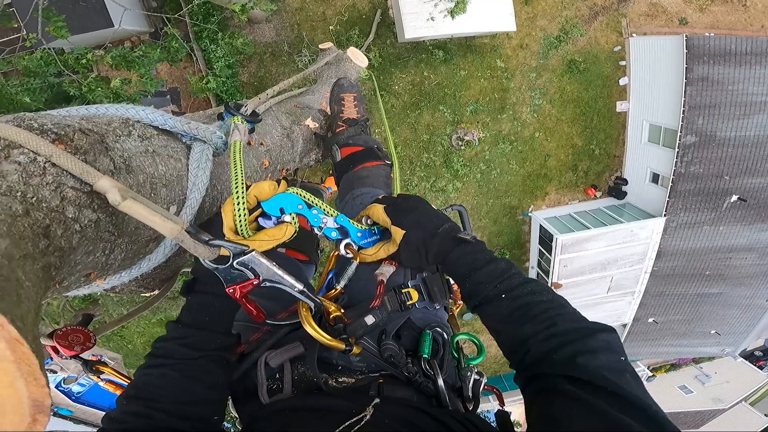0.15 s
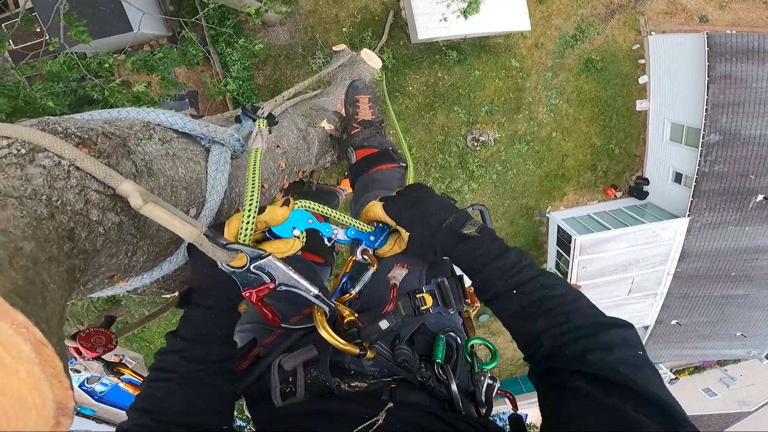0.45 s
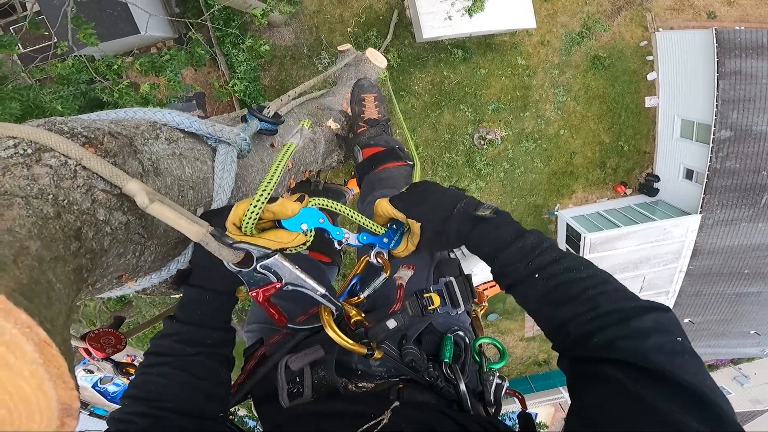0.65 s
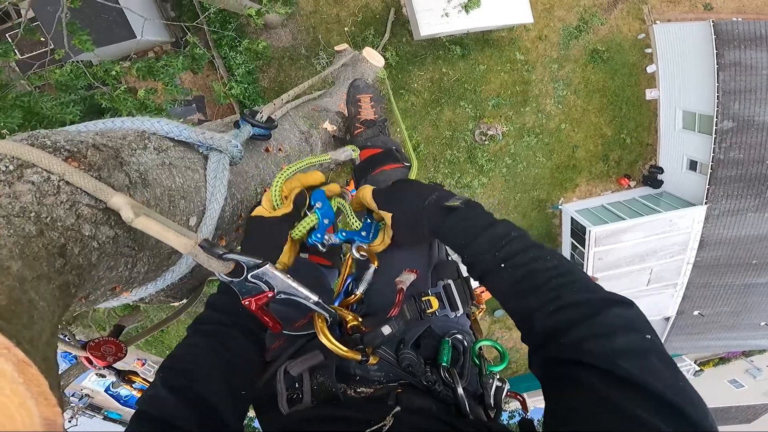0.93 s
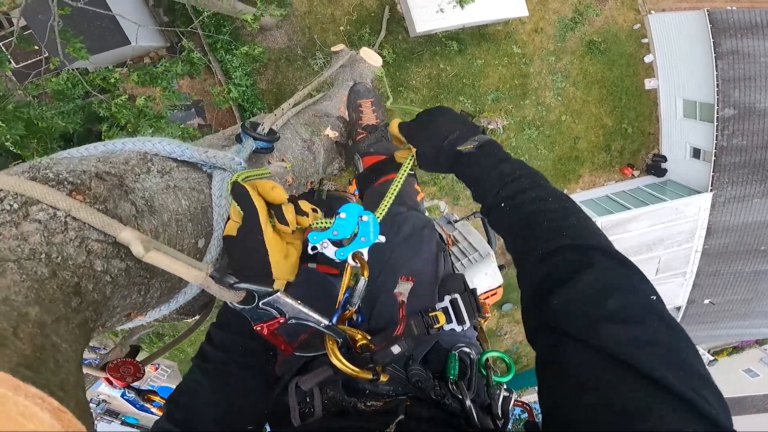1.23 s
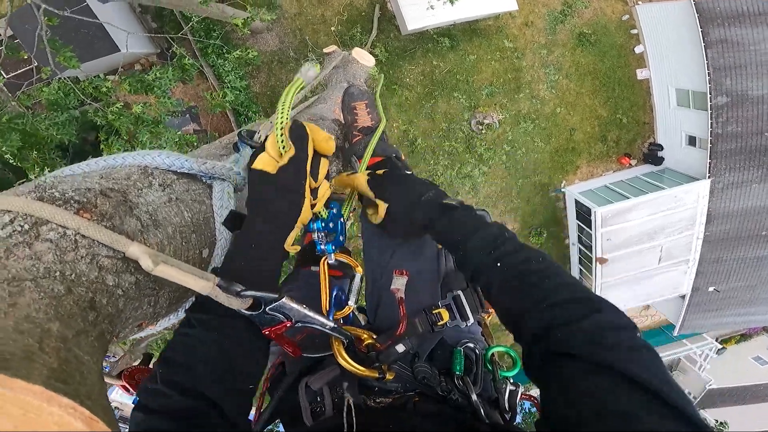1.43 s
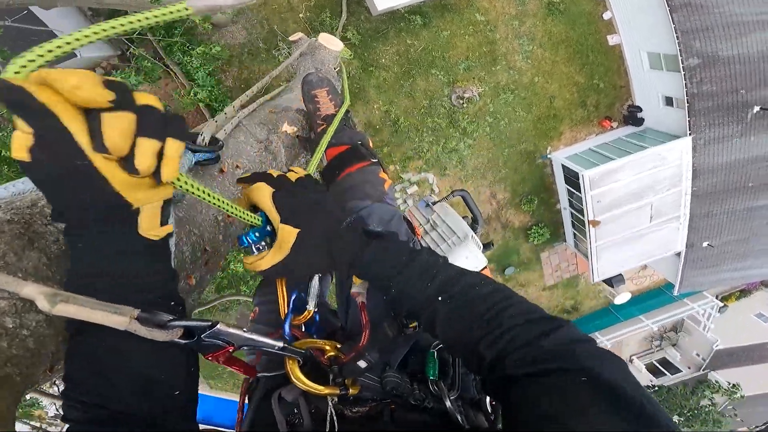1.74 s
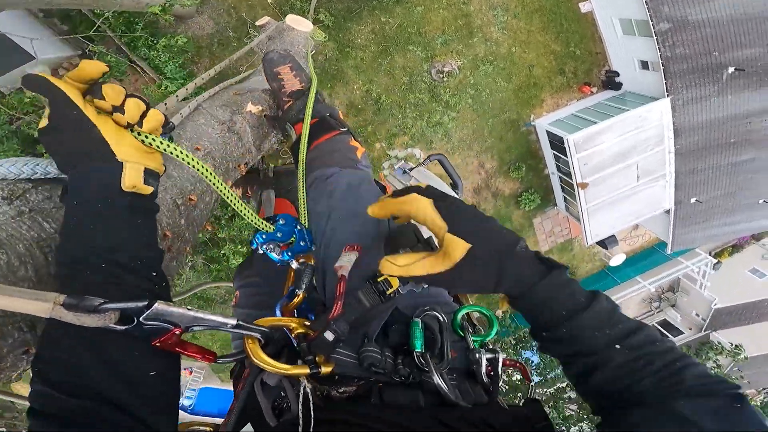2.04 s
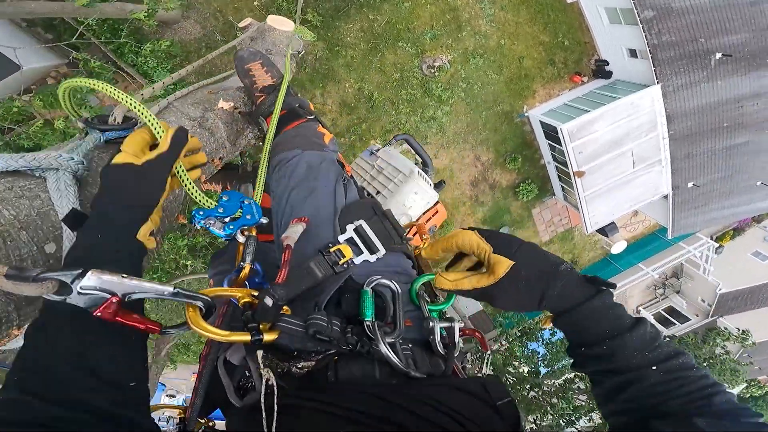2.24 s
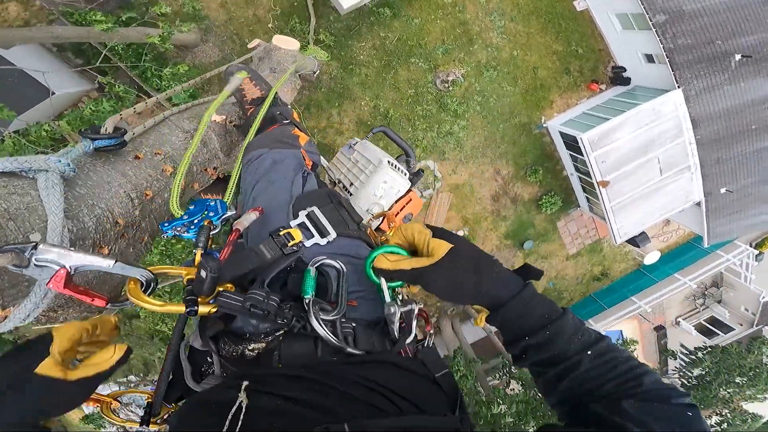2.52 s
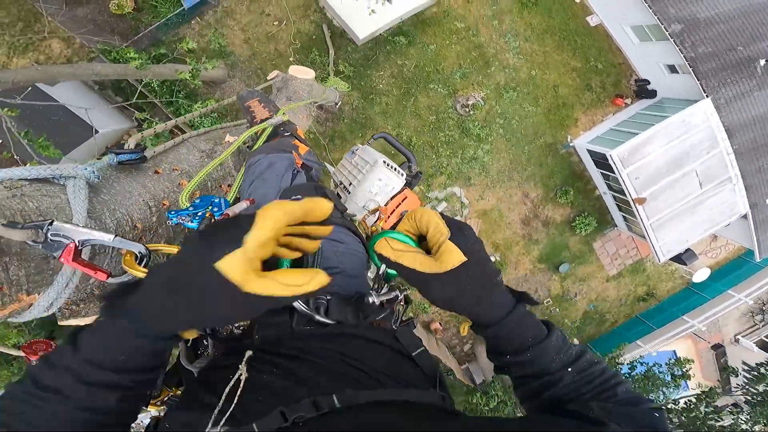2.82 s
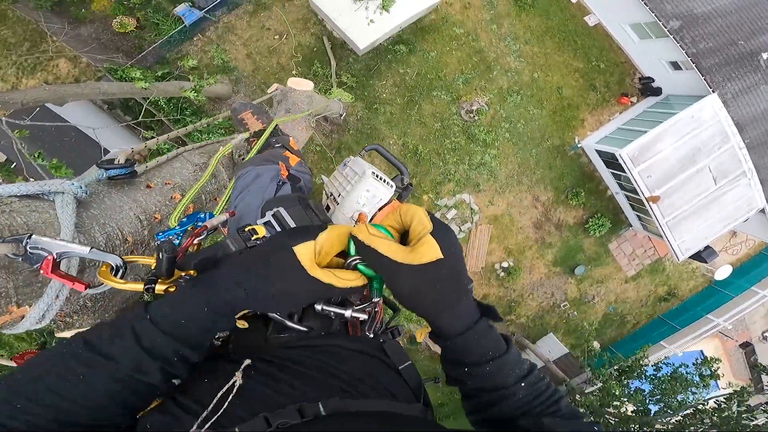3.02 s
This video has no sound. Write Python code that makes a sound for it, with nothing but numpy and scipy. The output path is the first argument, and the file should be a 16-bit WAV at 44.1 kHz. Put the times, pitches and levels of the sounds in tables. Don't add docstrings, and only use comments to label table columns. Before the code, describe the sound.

A metal rope device handled close by: light ringing cam ticks from 0.9 s, a loud rapid latch snap at 1.3, a double plate knock at 1.7. A rope pull scrapes from 1.8 to about 2.3 with dull cam chatter and glove rustle. Soft gear taps from 2.5, bright carabiner clinks near 3.0. A machine drones steadily, duller after 1.8; low wind buffets the near-mono microphone, strongest around 2.6.

```python
import sys
import numpy as np
from scipy import signal
from scipy.fft import rfft, irfft
from scipy.io import wavfile
from scipy.ndimage import uniform_filter1d

SR = 44100
rng = np.random.default_rng(int(sys.argv[2]) if len(sys.argv) > 2 else 0)


def level_to_linear(level):
    exponent = np.asarray(level, float) / 20
    return 10 ** exponent


def wav_out(sig):
    wavfile.write(sys.argv[1], SR, np.round(np.clip(np.atleast_2d(sig).T, -1, 1) * 32767).astype(np.int16))


N = 139797


def read(points, hz):
    f, value = np.transpose(points)
    return np.interp(np.log(hz + 1), np.log(f + 1), value)


def curve(rows, column=1):
    return np.interp(np.arange(N) / SR, np.array(rows)[:, 0], np.array(rows)[:, column])


def evened(x):
    return x / np.sqrt(np.mean(x ** 2) + 1e-20)


def band_rms(x, lo_hz, hi_hz):
    z, hz = rfft(x), np.fft.rfftfreq(len(x), 1 / SR)
    in_band = (hz > lo_hz) & (hz < hi_hz)
    return np.sqrt(2 * np.sum(abs(z[in_band]) ** 2)) / len(x)


def highpass(x, order, cutoff_hz):
    return signal.sosfilt(signal.butter(order, cutoff_hz, "high", fs=SR, output="sos"), x)


def resonate(x, hz, width_hz):
    turn = np.exp(2j * np.pi * hz * np.arange(len(x)) / SR)
    r = np.exp(-np.pi * width_hz / SR)
    return 2 * (turn * signal.lfilter([1 - r], [1, -r], x / turn)).real


def noise(points, size, patchy_db, flicker_db, tilt=None):
    hop = size // 4
    frames, hz = 4 * N // size + 5, np.fft.rfftfreq(size, 1 / SR)
    a, b, patches = rng.standard_normal((frames, len(hz), 3)).T
    patches = uniform_filter1d(uniform_filter1d(patches, size=8, axis=0), size=8, axis=1)
    flicker = uniform_filter1d(rng.standard_normal(frames), size=4)
    level_db = read(points, hz)[:, None] + patchy_db * evened(patches) + flicker_db * evened(flicker)
    if tilt is not None:
        octaves = np.log2(np.maximum(hz, 600) / 600)
        level_db = level_db + octaves[:, None] * tilt[np.minimum(np.arange(frames) * size // 4, N - 1)]
    spectra = (a + 1j * b) * level_to_linear(level_db)
    return evened(signal.istft(spectra, nperseg=size, noverlap=3 * hop)[1][:N])


def fibres(per_s, spread_db):
    size_db = spread_db * np.minimum(rng.exponential(1, N), 4)
    slips = level_to_linear(size_db) * (rng.random(N) < per_s / SR)
    power = np.convolve(slips ** 2, np.hanning(90), "same")
    return evened(np.sqrt(2 + evened(power)))


def clicks(events, modes, tick_s, width_hz, air_db=None):
    lead, length = 700, 5000
    hard_db, dull_db_per_db_khz = -16, .06
    grit_db, grit_s = -28, .005
    out = np.zeros(N + length)
    u = np.arange(length) / SR
    t = (np.arange(length) - lead) / SR
    cracks = rng.standard_normal((len(events), length))
    chance = rng.standard_normal((len(events), 2 * len(modes)))
    for (s, db, hz, ring_db, *own_air_db), crack, luck in zip(events, cracks, chance):
        decay = np.maximum(t - .001, 0) / tick_s
        onset = np.minimum(t - .001, 0) / min(tick_s, .0014)
        burst = crack * np.exp(onset - decay)
        body = burst
        for _ in range(3):
            body = resonate(body, hz, width_hz)
        air = resonate(resonate(burst, 11000, 7000), 11000, 7000)
        ring = 0
        for k, (f, mode_db, t60_s) in enumerate(modes):
            dull_db = dull_db_per_db_khz * max(hard_db - db, 0) * f / 1000
            gain = level_to_linear(mode_db - dull_db + 2.5 * luck[k] - 60 * u / t60_s)
            ring = ring + gain * np.sin(2 * np.pi * f * (1 + .004 * luck[-k - 1]) * u)
        strike = (t == 0) + level_to_linear(grit_db) * crack[::-1] * np.exp(-abs(t) / grit_s)
        ring = signal.fftconvolve(strike, ring * np.clip(u / .0008, 0, 1))[:length]
        air_gain = level_to_linear(own_air_db[0] if own_air_db else air_db)
        sound = body / abs(body).max() + air_gain * air / abs(air).max() + level_to_linear(ring_db) * ring
        out[round(s * SR) - lead:][:length] += level_to_linear(db) * sound
    return out[:N]


def wind():
    # t/s, level/dB
    gusts = [(0.12, -25.5), (0.83, -22.5), (0.85, -55), (1.02, -21), (2.2, -31.5), (2.61, -16.5),
             (3.16, -20)]
    # f/Hz, density/dB
    buffet = [(8.8, -43), (15, -5.5), (85, -0.5), (113, -6), (145, -4), (258, -28), (300, -29), (390, -57),
              (660, -120)]
    return level_to_linear(curve(gusts) - 2.0) * noise(buffet + [(600, -68)], size=2048, patchy_db=.5, flicker_db=1.5)


def machine():
    # t/s, level/dB, brightness/(dB/octave)
    drone = [(.06, -25, 0.5), (1.25, -25, 0), (1.75, -25.5, -2), (2.3, -28, -3.5), (2.6, -25.5, -2.5),
             (3.16, -26.5, -1)]
    # f/Hz, density/dB
    roar_spectrum = [(60, -5.5), (300, -7), (500, -12.5), (1000, -14.5), (2400, -24), (2750, -33),
                     (7000, -44.5), (15500, -81.5)]
    # f/Hz, width/Hz, level/dB
    housing = [(998, 42, -5), (3100, 610, -0.5)]
    # f/Hz, level/dB, swell when facing/dB
    lines = [(72.5, -30.5, -1.5), (178, -38, 0), (214.2, -31, 3), (250.2, -38, 0), (337.6, -30.5, -1),
             (675, -35.5, 4.5), (1012.6, -42, -3), (1349.5, -46, 2), (1748, -46, -0.5)]
    roar = noise(roar_spectrum, size=1024, patchy_db=.06, flicker_db=.81, tilt=curve(drone, column=2))
    roar = roar + sum(level_to_linear(db - 3.0) * resonate(roar, hz, width_hz) for hz, width_hz, db in housing)
    hiss, t = rng.standard_normal(N), np.arange(N) / SR
    facing_s, facing_span_s, line_width_hz = 1.8, .6, 9
    facing = 2 * np.exp(-((t - facing_s) / facing_span_s) ** 2) - 1
    hum = np.zeros(N)
    for hz, db, swell_db in lines:
        waver = evened(resonate(resonate(hiss, hz, line_width_hz), hz, line_width_hz))
        hum += level_to_linear(db + swell_db * facing) * evened(1.5 * np.sin(2 * np.pi * hz * t) + waver)
    return level_to_linear(curve(drone) - 1.5) * roar / band_rms(roar, lo_hz=315, hi_hz=880) + hum


def rustle():
    # t/s, level/dB
    rub = [(0.8, -51), (1.3, -46), (1.78, -39.5), (1.83, -29.5), (2.0, -26), (2.12, -33.5), (2.24, -41),
           (2.3, -48), (2.45, -43), (2.69, -42), (2.9, -41.5), (3.16, -39.5)]
    # f/Hz, density/dB
    rustle_spectrum = [(1500, -22), (3000, -6.5), (4000, -0.5), (4600, 1), (5400, -4.5), (7000, -10.5),
                       (9500, -21), (15500, -31.5)]
    grain = noise([(800, -45)] + rustle_spectrum, size=256, patchy_db=1.8, flicker_db=.5)
    grain = grain * fibres(per_s=2000, spread_db=1.8)
    fade_in = np.clip((np.arange(N) / SR - .7) / .2, 0, 1)
    return level_to_linear(curve(rub) - 3.5) * fade_in * grain / band_rms(grain, lo_hz=3450, hi_hz=7100)


def held_gear():
    # t/s, peak/dB, tick f/Hz, ring/dB, brightness/dB
    taps = [(2.508, -31.5, 4710, -20, -27), (2.6234, -25, 4800, -11, -3.5), (2.6473, -29, 4870, -36, -30),
            (2.6594, -28, 5500, -14, -8), (2.700, -37, 8000, -14, -20), (2.711, -22, 3550, -11, -16),
            (2.8134, -29, 4900, -17, -20), (3.0455, -32, 6950, -16, -12), (3.0510, -26, 4070, -24, -30)]
    # f/Hz, level/dB, t60/s
    held = [(8000, -4, .022), (10000, -9, .008), (12500, -9, .008), (15200, -10, .006)]
    return clicks(taps, held, tick_s=.0015, width_hz=3700)


def carabiners():
    # t/s, peak/dB, tick f/Hz, ring/dB
    clinks = [(2.938, -36, 3580, 3), (2.9640, -36, 4200, -14), (2.9712, -21, 3900, -14),
              (2.9770, -21, 3000, 3), (2.9840, -27, 3670, -8), (2.9930, -26, 3600, -10),
              (3.0770, -22, 3630, -18), (3.0825, -30, 4000, -4), (3.0930, -30, 4760, -8),
              (3.1014, -30, 3660, -9)]
    # f/Hz, level/dB, t60/s
    hook = [(4650, -16, .02), (5860, -13, .025), (7180, -11, .018), (7983, -3, .1), (9500, -12, .02),
            (11400, -24, .03), (11800, -21, .045), (12230, -21, .045), (14600, -28, .02)]
    # t/s, peak/dB, tick f/Hz, ring/dB
    ring_clink = [(2.5683, -28, 4200, -9)]
    # f/Hz, level/dB, t60/s
    ring_modes = [(8600, -5, .075), (4200, -14, .02)]
    return (clicks(clinks, hook, tick_s=.0011, width_hz=4000, air_db=-36)
            + clicks(ring_clink, ring_modes, tick_s=.0021, width_hz=3400, air_db=-26))


def rope():
    # f/Hz, density/dB
    braid_spectrum = [(450, -12), (750, 4.5), (1500, 3.5), (2100, 0), (3000, -7.5), (5000, -8), (8400, -27),
                      (15500, -87)]
    pull_s, rise_s, hold_s, fall_db_per_s, pull_db = 1.79, .031, .27, 47, -21.5
    bite_s, bite_span_s, bite_hz, bite_width_hz, bite_db = 1.87, .044, 1530, 450, -1
    t = np.arange(N) / SR
    since_s = t - pull_s
    shape = np.clip(since_s / rise_s, 0, 1) * level_to_linear(-fall_db_per_s * np.maximum(since_s - hold_s, 0))
    braid = fibres(per_s=2200, spread_db=1.8) * noise(braid_spectrum, size=256, patchy_db=1.7, flicker_db=.8)
    bite = np.exp(-((t - bite_s) / bite_span_s) ** 2) * resonate(braid, bite_hz, bite_width_hz)
    return level_to_linear(pull_db) * shape * (braid + level_to_linear(bite_db) * bite)


def loaded_cam():
    # t/s, peak/dB, tick f/Hz, ring/dB
    chatter = [(1.8817, -19, 5360, -20), (1.97, -33, 4200, -16), (2.0968, -15.5, 4370, -9),
               (2.2037, -22.5, 4180, -10), (2.3454, -26.5, 4270, -5), (2.356, -33, 4060, -2)]
    # f/Hz, level/dB, t60/s
    loaded = [(4760, -14, 0.041), (5200, -20, .05)]
    return clicks(chatter, loaded, tick_s=.027, width_hz=1900, air_db=-31)


def side_plate():
    # t/s, peak/dB, tick f/Hz, ring/dB, brightness/dB
    knock = [(1.6985, -15, 2600, -6, -9), (1.7005, -19, 5700, -8, -8)]
    # f/Hz, level/dB, t60/s
    plate = [(2160, -1, .014), (2500, -4, .01), (2890, -2, .04), (3300, 0, .012), (4820, -10, .012),
             (5650, -2, .014), (6760, -8, .01), (7480, -9, .01), (8900, -14, .006), (11200, -14, .01),
             (12700, -19, .008)]
    return clicks(knock, plate, tick_s=.002, width_hz=3500)


def latch():
    # t/s, peak/dB, tick f/Hz, ring/dB, brightness/dB
    snaps = [(1.2900, -31, 6000, -10, -30), (1.2966, -14, 4800, -7, -20), (1.3010, -27, 5500, -20, -26),
             (1.3045, -20.5, 4500, -7, -26), (1.3080, -21, 3800, -13, -29), (1.3114, -4.5, 3850, -18, -19),
             (1.3150, -17, 4600, -5, -20), (1.3178, -23, 6100, -8, -12), (1.3270, -19, 3700, -6, -30),
             (1.3320, -25, 3600, -15, -30)]
    # f/Hz, level/dB, t60/s
    latch_modes = [(2900, -6, .012), (3480, 0, .016), (4100, -2, .018), (5600, -2, .016), (6170, -4, .022),
                   (6550, -4, .022), (7140, -7, .018), (8690, -12, .012), (10300, -17, .012),
                   (10820, -16, .016), (13200, -26, .01)]
    return highpass(clicks(snaps, latch_modes, tick_s=.0009, width_hz=6000), order=4, cutoff_hz=2500)


def cam():
    # t/s, peak/dB, tick f/Hz, ring/dB, brightness/dB
    cam_ticks = [(.8954, -27, 4710, -8, -34), (.9060, -15, 4660, -16, -20), (.9294, -35, 4810, -4, -34),
                 (.9782, -17.5, 5160, -16, -13), (.9900, -26, 4150, -5, -30), (1.0140, -40, 6000, -20, -30),
                 (1.0500, -34, 5000, -20, -8), (1.0846, -18, 4600, -7.5, -14), (1.1030, -41, 5100, -6, -30),
                 (1.1164, -40, 4940, -7, -21), (1.2188, -22.5, 4700, -10, -19),
                 (1.2464, -31, 4800, -10, -24), (1.3502, -28, 4980, -9, -25), (1.3640, -28, 4900, -2, -34),
                 (1.3810, -29, 4860, -9, -34)]
    # f/Hz, level/dB, t60/s
    cam_modes = [(3150, -10, .012), (4240, -5, .02), (4760, -1, .04), (5030, -3, .08), (6040, -8, .025),
                 (7650, -13, .02), (9690, -12, .045), (12150, -21, .018), (14300, -25, .02)]
    return clicks(cam_ticks, cam_modes, tick_s=.002, width_hz=2100)


def scene():
    # start t/s, end t/s
    apart_spans = [(.38, 1.03), (1.06, 1.36), (1.41, 1.47), (1.58, 1.98), (2.1, 2.59), (2.65, 2.69),
                   (2.8, 3.07), (3.1, 3.15)]
    side_db, side_top_db = -24.5, -59
    metal = cam() + latch() + side_plate() + carabiners() + held_gear() + loaded_cam()
    metal = highpass(metal, order=4, cutoff_hz=1800)
    scatter = rng.standard_normal(2500) * level_to_linear(-60 * np.arange(2500) / SR / .04)
    echo = signal.oaconvolve(metal, scatter / np.linalg.norm(scatter))[:N]
    mid = metal + level_to_linear(-12) * echo + rope() + rustle() + wind() + machine()
    t = np.arange(N) / SR
    apart = uniform_filter1d(sum((t > a) & (t < b) for a, b in apart_spans) * 1., size=300)
    side = highpass(np.roll(mid + 2 * metal, 41), order=6, cutoff_hz=2800)
    top_spectrum = [(11300, -60), (12000, 0), (13500, 0), (15300, 4), (16000, -60)]  # f/Hz, density/dB
    top = noise(top_spectrum, size=256, patchy_db=1.5, flicker_db=.7)
    top = top * np.clip(np.minimum(t - 1.35, 2.9 - t) / .3, 0, 1)
    side = level_to_linear(side_db) * apart * side + level_to_linear(side_top_db) * top
    return np.array([mid + side, mid - side])


def low_pass(x):
    return signal.sosfilt(signal.butter(12, 16540, fs=SR, output="sos"), x)


def record(dry):
    # f/Hz, gain/dB
    mic = [(9000, 0), (12000, -5), (14300, -14), (15700, -21), (16400, -50)]
    duck_s, duck_db, duck_hold_s, duck_release_s = 1.314, -11, .05, .045
    start_s = .0565
    t = np.arange(N) / SR
    bass = signal.sosfiltfilt(signal.butter(2, 750, fs=SR, output="sos"), dry)
    treble = signal.sosfiltfilt(signal.butter(2, 2900, "high", fs=SR, output="sos"), dry)
    release = np.exp(-np.maximum(t - duck_s - duck_hold_s, 0) / duck_release_s)
    duck = level_to_linear(duck_db * np.clip((t - duck_s) / .003, 0, 1) * release)
    x = (bass + treble) * duck ** .3 + (dry - bass - treble) * duck
    x = x * np.clip((N / SR - t) / .002, 0, 1)
    response = level_to_linear(read(mic, np.fft.rfftfreq(256, 1 / SR)))
    fir = np.roll(irfft(response), 128) * np.hanning(256)
    return low_pass(signal.oaconvolve(x, fir[None], "same") * (t > start_s))


dry = scene()
out = record(dry)
wav_out(out)
```